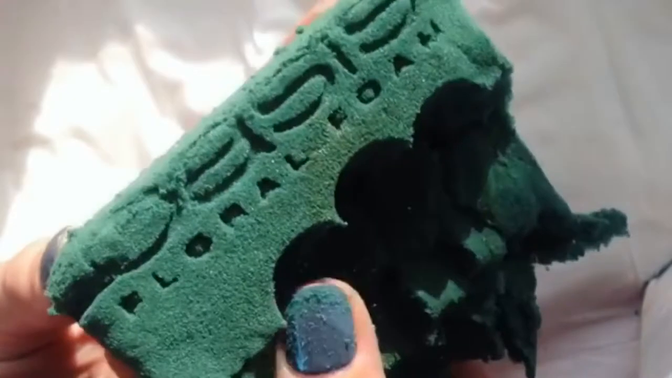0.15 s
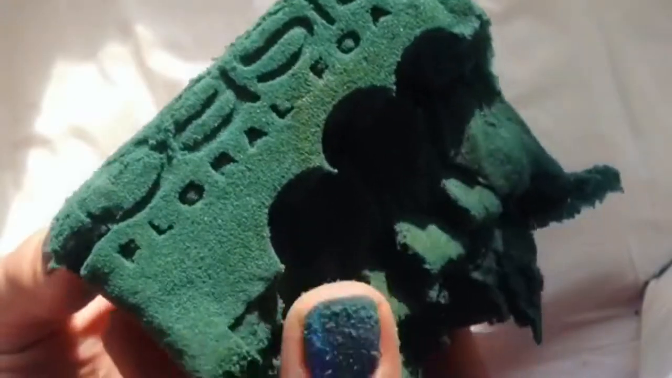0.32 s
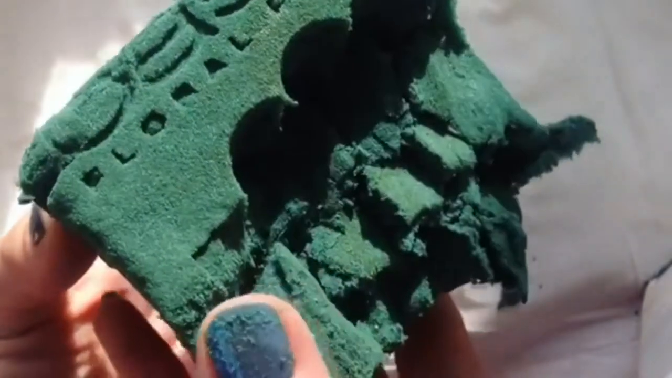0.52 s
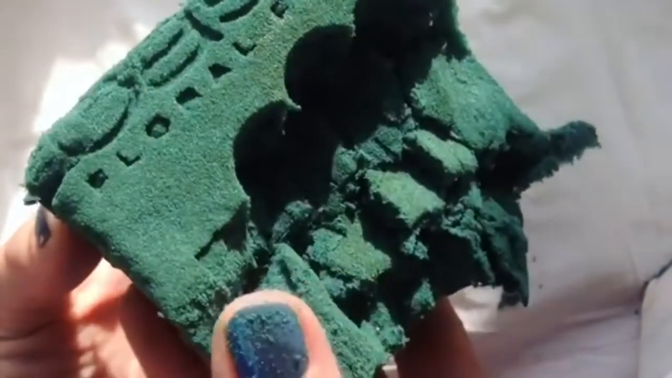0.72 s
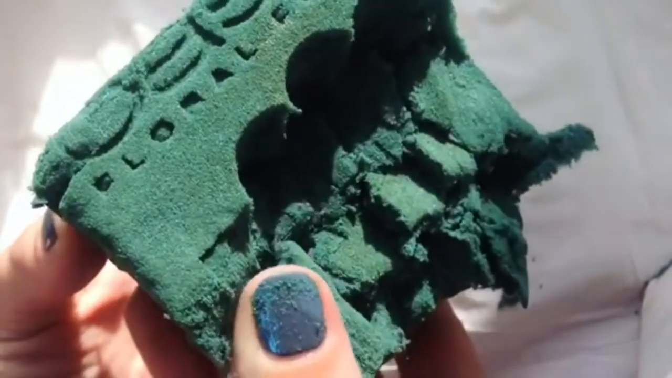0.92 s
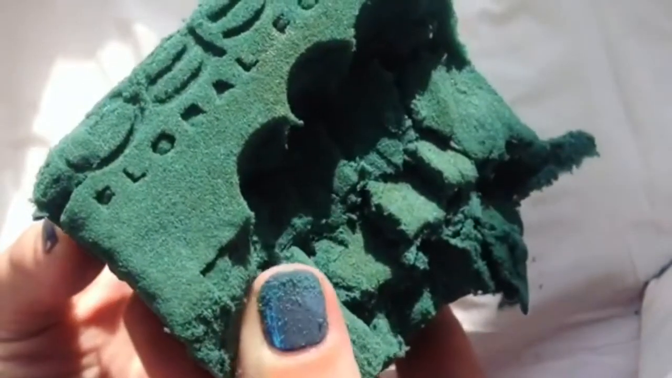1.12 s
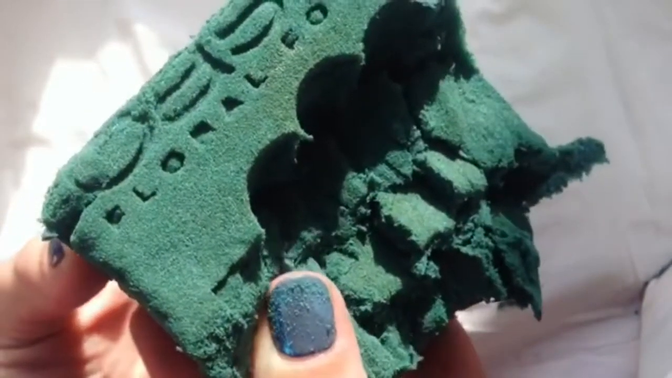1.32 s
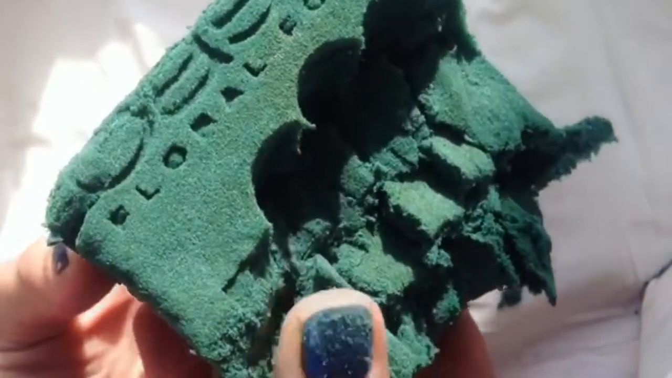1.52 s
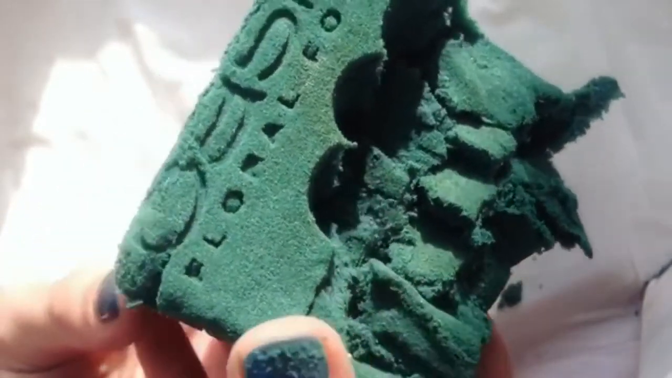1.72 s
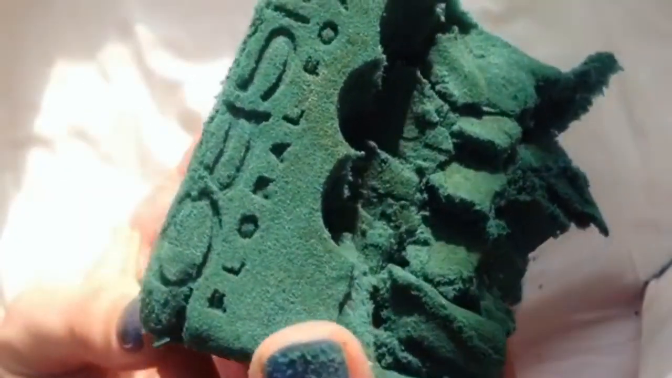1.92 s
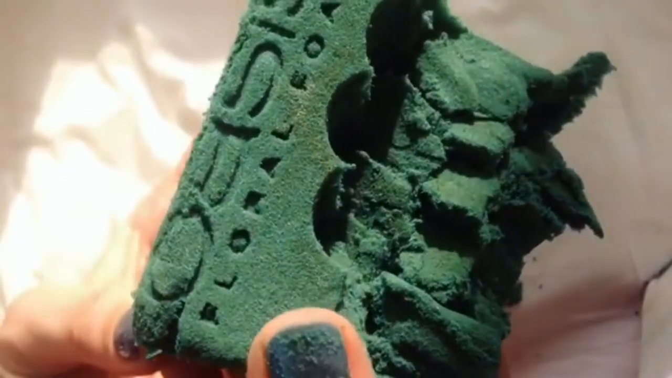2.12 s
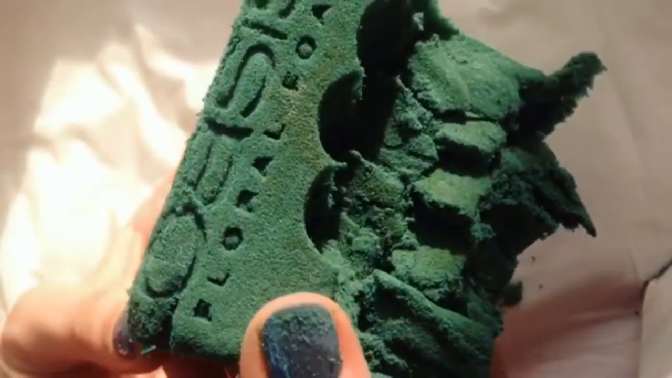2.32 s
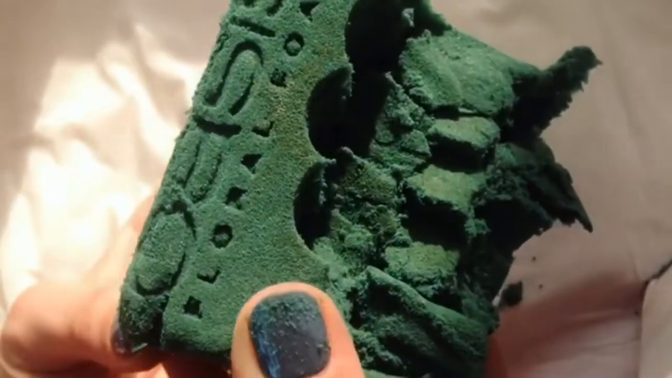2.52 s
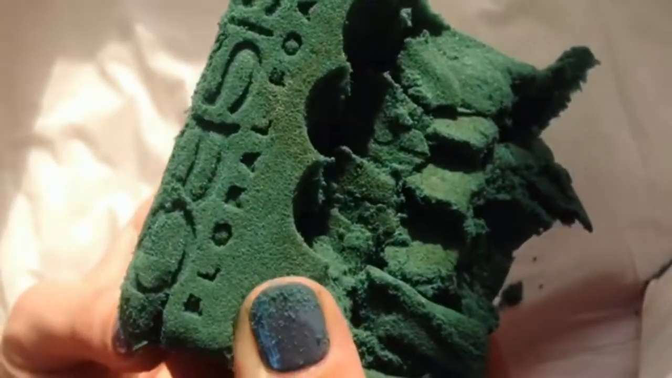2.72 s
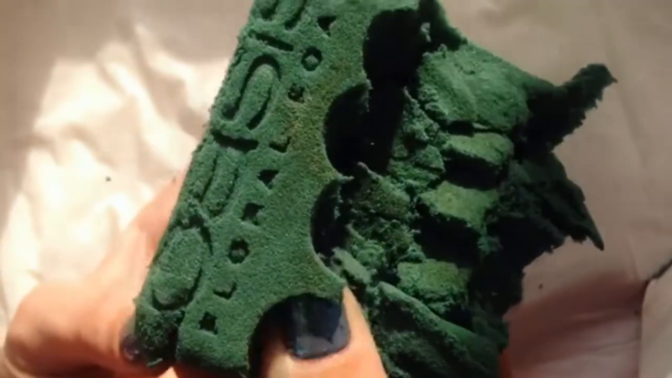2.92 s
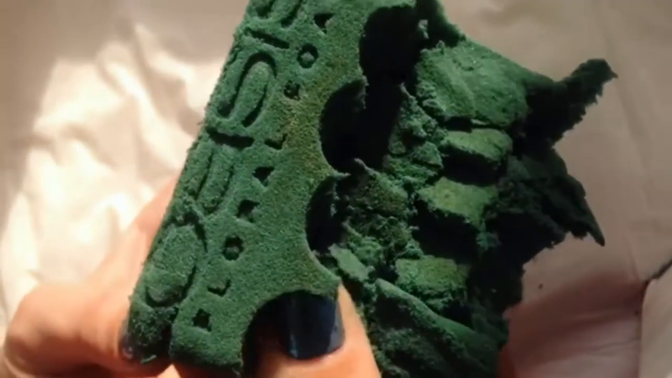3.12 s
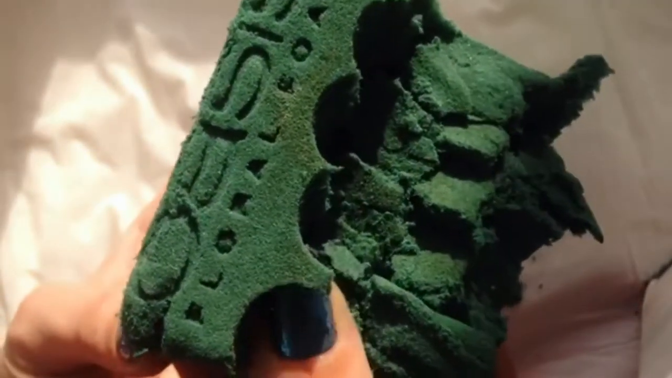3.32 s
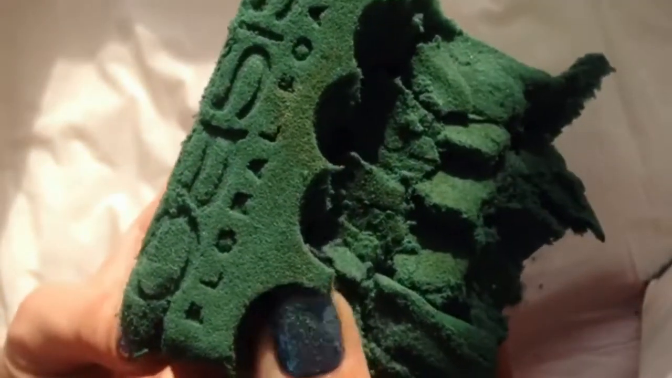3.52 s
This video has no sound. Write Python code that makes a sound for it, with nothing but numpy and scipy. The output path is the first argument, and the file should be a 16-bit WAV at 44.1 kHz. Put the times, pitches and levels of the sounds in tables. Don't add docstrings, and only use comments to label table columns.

```python
import sys
import numpy as np
from scipy import signal
from scipy.fft import rfft, irfft
from scipy.io import wavfile
from scipy.ndimage import uniform_filter1d

SR = 44100
rng = np.random.default_rng(int(sys.argv[2]) if len(sys.argv) > 2 else 0)


def invert_db(x):
    u = np.asarray(x, float) / 20
    return 10 ** u


def to_wav(s):
    ch = np.atleast_2d(s).T
    pcm = np.round(np.clip(ch, -1, 1) * 32767)
    wavfile.write(sys.argv[1], SR, pcm.astype(np.int16))


N = 160965


def unit(x):
    return x / np.sqrt(np.mean(x ** 2))


def ring(x, hz, width_hz):
    return signal.lfilter(*signal.iirpeak(hz, hz / width_hz, fs=SR), x)


def colour(x, table):
    f = np.linspace(1, SR / 2, 2049)
    hz, db = np.array(table).T
    log_gain = np.interp(np.log(f), np.log(hz), db) * np.log(10) / 20
    cepstrum = irfft(log_gain)
    cepstrum[1:2048] *= 2
    cepstrum[2049:] = 0
    impulse = irfft(np.exp(rfft(cepstrum)))
    return signal.fftconvolve(x, impulse)[:len(x)]


def walk(rate_hz):
    held = rng.standard_normal(N // 20)
    hold = max(int(SR / rate_hz), 20)
    steps = np.repeat(held, hold)[:N]
    return unit(uniform_filter1d(uniform_filter1d(steps, hold), hold))


# frequency_hz [Hz], level_db [dB]
ROOM_SPECTRUM = [(15, -22.5), (25, -7.5), (78, 5.5), (144, -2), (225, -4), (286, -7.5), (684, -19.5),
                 (4370, -12), (14000, -25)]
ROOM_DB = -61
HUM_HZ, HUM_DB = 58.7, -67
VENT_HZ, VENT_DB = 160.5, -66


def room():
    air = unit(colour(rng.standard_normal(N), ROOM_SPECTRUM))
    tone = invert_db(ROOM_DB + walk(7.8)) * air
    hum = unit(ring(ring(rng.standard_normal(N), HUM_HZ, 5), HUM_HZ, 6))
    vent = unit(ring(ring(rng.standard_normal(N), VENT_HZ, 30), VENT_HZ, 38))
    return tone + invert_db(HUM_DB) * hum + invert_db(VENT_DB + 2.1 * walk(4)) * vent


BURSTS_PER_S, BURST_SPREAD_DB = 14000, 1.5


def bursts():
    when = rng.random(N)
    size = rng.exponential(size=N)
    sign = rng.standard_normal(N)
    return unit((when < BURSTS_PER_S / SR) * invert_db(BURST_SPREAD_DB * size) * sign)


# frequency_hz [Hz], width_hz [Hz], level_db [dB]
DEEP_MODES = [(240, 83, -28.5), (513, 178, -8.5), (903, 250, -6), (1104, 267, -2)]
# frequency_hz [Hz], width_hz [Hz], level_db [dB]
WALL_MODES = [(1883, 570, -5.5), (2470, 294, -1.5), (3200, 1080, -11.5), (4680, 1700, -11.5)]
# frequency_hz [Hz], level_db [dB]
CELL_SPECTRUM = [(300, -38), (1000, -7.5), (2000, -8.5), (5500, -5.5), (7000, -5.5), (10500, -1.5),
                 (13500, -6.5), (17000, -14.5)]
# start_s [s], level_db [dB]
GRIP = [(0, -6.5), (.3, -1.5), (.4, -1), (1.45, 3.5), (1.9, -5), (2.2, -4), (2.4, 3), (2.95, -0.5),
        (3.05, -1.5)]
WALL_LEAN = (-0.5, 1, -0.5, 0)
MODE_SCATTER_DB = 2


def block(wall_env, deep_env, bright_env, jolts=0):
    pops, other = bursts(), bursts()

    def mode(k, env, hz, width_hz, db):
        drive = pops + np.roll(other, k * 997) + jolts
        return invert_db(db) * ring(env * invert_db(MODE_SCATTER_DB * walk(80)) * drive, hz, width_hz)

    grip = invert_db(np.interp(np.arange(N) / SR, *np.array(GRIP).T))
    knock = np.zeros(N)
    for k, row in enumerate(DEEP_MODES):
        knock += mode(k, deep_env, *row)
    for k, row in enumerate(WALL_MODES):
        knock += mode(-k - 1, wall_env * grip ** WALL_LEAN[k], *row)
    return 2 * knock + colour(bright_env * pops, CELL_SPECTRUM)


CLUMPS_PER_S, CLUMP_DB, CLUMP_TOP_DB = 400, 3.5, 7


def clumps():
    def bunching():
        return np.minimum(CLUMP_DB * (walk(CLUMPS_PER_S) ** 2 - 1) / 2, CLUMP_TOP_DB)

    shared, own = bunching(), bunching()
    return invert_db(np.array([shared, shared, (shared + own) / 2]))


# peak_s [s], level_db [dB], rise_s [s], fall_s [s], brightness_db [dB]
RUBS = [(0.069, -50, 0.19, 0.3, -6), (.165, -49.5, 0.17, 0.052, 5), (.32, -49.5, 0.092, 0.61, 1),
        (0.459, -44.5, 0.74, 0.22, -18), (0.611, -53.5, 0.062, 0.1, -22), (0.757, -39, 0.085, 0.1, -4),
        (1.668, -43, 0.23, 0.22, 0), (1.875, -41, 0.33, 0.22, -24), (2.001, -45.5, 0.16, 0.15, -28),
        (2.125, -41.5, 0.26, 0.14, -22), (2.25, -53.5, 0.49, 0.33, -22), (2.33, -51, 0.21, 0.058, 3.5),
        (3.609, -49.5, 0.16, 0.21, 1)]
# peak_s [s], level_db [dB], rise_s [s], fall_s [s], depth_db [dB]
SQUEEZES = [(0.226, -19.5, 0.013, 0.13, 2.5), (0.248, -20, 0.091, 0.059, -5.5),
            (0.272, -23.5, 0.12, 0.025, 1), (0.284, -32, 0.037, 0.03, -7), (0.932, -41, 0.34, 0.54, -1),
            (1.03, -33.5, 0.23, 0.23, -5), (1.148, -33.5, 0.16, 0.33, -4.5),
            (1.269, -35.5, 0.14, 0.22, -5.5), (1.36, -33.5, 0.26, 0.2, -5.5), (1.421, -33, 0.23, 0.2, -11),
            (1.5, -36, 0.13, 0.096, -19), (2.389, -38, 0.14, 0.25, -3.5), (2.47, -41.5, 0.093, 0.5, -10),
            (2.544, -31, 0.035, 0.05, -7), (2.638, -37.5, 0.032, .05, -6), (2.671, -36, 0.071, 0.058, -32),
            (2.822, -30, 0.21, 0.081, -6.5), (2.878, -35, 0.061, 0.019, -7), (2.928, -37, 0.094, 0.04, -7),
            (2.96, -38.5, 0.14, .15, -4.5), (3.08, -23, 0.052, 0.096, -4.5), (3.11, -42, .06, 0.24, -3),
            (3.267, -31, 0.11, 0.087, -5), (3.39, -33.5, 0.22, 0.13, -6)]
FADE_DB = 47.5
RUB_DEPTH_DB, RUB_CELLS_DB = -16, 0.5
DULL_PER_DEPTH = 0.25


def rubs_and_squeezes(t):
    power = np.zeros((3, N))
    rows = [(*r, -DULL_PER_DEPTH * r[4]) for r in SQUEEZES]
    rows += [(*r[:4], RUB_DEPTH_DB, r[4]) for r in RUBS]
    for at, db, rise, fall, depth_db, bright_db in rows:
        near = slice(max(int((at - 2 * rise) * SR), 0), int((at + 2 * fall) * SR))
        u = np.where(t[near] < at, (at - t[near]) / rise, (t[near] - at) / fall)
        swell = invert_db(db - FADE_DB * u ** 1.114)
        balance = invert_db(np.array([[0], [depth_db], [bright_db + RUB_CELLS_DB]]))
        power[:, near] += (swell * balance) ** 2
    return block(*(np.sqrt(power) * clumps()))


# start_s [s], level_db [dB], depth_db [dB], length_ms [ms]
TICKS = [(0.057, -41, -4, 2), (.148, -33, 2.5, 1.04), (0.402, -38, -9, 1.7), (0.747, -38, -12, 1.4),
         (.921, -46, -17, 0.99), (1.882, -37, 7, 0.83), (1.992, -45, 15, 0.77), (2.075, -44, 7, 1.2),
         (2.279, -37.5, -2, 1.9), (3.223, -36, -2.5, 1.3), (3.61, -39.5, -12, 1.5)]
# start_s [s], level_db [dB], depth_db [dB], length_ms [ms]
CRUSH = [(0.1845, -29, -3, 1.1), (.1985, -18, 4, 1.3), (0.2086, -1, -4, 1.04), (0.2103, -1, -5, 0.67),
         (.216, -6, 0, 1), (0.224, -10, 3, 1.1), (0.231, -13, -11, 0.98), (.238, -9, -26, 1.7),
         (0.251, -6, 7.5, 1.6), (.2605, -17, 4, 2.2), (0.271, -19, 4, 1.9), (0.22, -14, -6, 0.86)]
# start_s [s], level_db [dB], depth_db [dB], length_ms [ms]
CRUMBLE = [(0.9459, -9.5, 6.5, 1.23), (0.984, -22, -2, 1), (.998, -24.5, 5, 2.2), (1.021, -25, 7, 1.3),
           (1.053, -22, -3.5, 5.1), (1.078, -24, 3.5, 1.1), (1.112, -24, -16, 2.4), (1.14, -16.5, 0, 2.3),
           (1.151, -17, -4, 1.2), (1.161, -30, -2, 1.5), (0.957, -21, 5, 1.5), (1.033, -24, 5, 1.6),
           (1.131, -22.5, 4, 0.91), (1.177, -30, 9, 1.4), (1.194, -31, 3, 1.1), (1.226, -27, 3, 1.8),
           (1.263, -20.5, 7, 1.05), (1.348, -19, -8, 0.62), (1.417, -19, -12, 1.1), (1.503, -18, -6, 0.88),
           (1.2136, -12.5, -14, 0.44), (1.247, -21, -2.5, 5), (1.279, -17, -6, 2.9),
           (1.3059, -14.5, -7, 1.2), (1.3409, -15.5, -8, 1.06), (1.374, -19, -7, 3.4),
           (1.391, -18, -2, 2.8), (1.41, -17, -6, 0.93), (1.422, -17, 1.5, 3.1), (1.476, -18, -6.5, 2.1),
           (1.489, -16.5, 1, 2.1)]
# start_s [s], level_db [dB], depth_db [dB], length_ms [ms]
SNAPS = [(2.353, -26.5, 4, 1), (2.374, -6.5, 0, 1.32), (2.383, -26, 2, 2.4), (2.427, -11.5, -4.5, 1.54),
         (2.455, -43, -8, 1.1), (2.473, -28, 5, 1.2), (2.493, -29.5, 6.5, 1.2), (2.513, -20, 2, 1.25),
         (2.546, -24, 2.5, 2.2), (2.6209, -22, 11, 1.8), (2.624, -17.5, -3, 3.2), (2.655, -20, 3, 1.5),
         (2.667, -17, 6.5, 1.86), (2.709, -13.5, 1, 2.95), (2.739, -23, 5, 0.7), (2.745, -12, 2.5, 2.26),
         (2.755, -22, 4, 0.45), (2.768, -34, 5, 1.4), (2.809, -16, 6, 2.5), (2.828, -11.5, -0.5, 1.6),
         (2.87, -13.5, 0, 0.78), (2.921, -15, -1, 3.7), (2.945, -8.5, 7, 3.34), (3.062, -15, -1, 3),
         (3.242, -17, -1, 2), (3.2558, -15.5, -1, 0.95), (3.279, -26, -8, 1.7), (3.35, -26.5, -8, 2.1),
         (3.081, -18.5, 3.5, 1.1), (3.092, -20.5, 1.5, 1.5), (3.097, -16, -2, 1.6), (3.337, -23.5, -7, 1.6),
         (3.4, -26.5, -9, 6.2)]
CRACK_RISE, BREAK_RISE = 0.78, 0.093
CRACK_DB, CRACK_CELLS_DB, SNAP_DB = -6, -3, 7
DULL_PER_DB = 0.0868


def cracks():
    env, jolts = np.zeros((3, N + SR)), np.zeros(N)
    u_ms = (np.arange(1500) - 500) * 1000 / SR
    rows = [(*r, CRACK_RISE) for r in CRUSH + CRUMBLE + SNAPS + TICKS]
    rows += [(*r, BREAK_RISE) for r in BREAKS]
    for at, db, depth_db, ms, rise in rows:
        shape = np.exp(-np.where(u_ms < 0, -u_ms / rise, u_ms) / ms)
        bright_db = CRACK_CELLS_DB - DULL_PER_DEPTH * depth_db - DULL_PER_DB * max(db + 8.5, -10)
        balance_db = np.array([[0], [depth_db], [bright_db]])
        peak = int((at + ms / 2000) * SR)
        env[:, peak - 500:peak + 1000] += invert_db(db + CRACK_DB + balance_db) * shape
        jolts[peak] = invert_db(SNAP_DB) / ms
    return block(*env[:, :N], jolts)


# peak_s [s], level_db [dB], pitch_hz [Hz], length_ms [ms]
PINGS = [(0.21, -9, 2950, 1.1), (.21, -5, 4950, 1.2), (0.236, -12, 2690, 2.2), (0.2558, -11.5, 3300, 1.5),
         (.268, -14, 1890, 4.2), (1.141, -16, 2660, 1), (1.249, -22, 1797, 3), (1.341, -18.5, 2460, 1.5),
         (1.376, -24, 2460, 3.9), (1.861, -37, 2440, 3.5), (1.886, -36, 1690, 4), (2.375, -19.5, 525, 1.02),
         (2.787, -14.5, 2540, 2.3), (2.81, -27, 2500, 2.5), (2.946, -13, 2590, 1.2),
         (3.072, -11, 3320, 1.9), (3.256, -17.5, 2970, 0.9), (3.3667, -3.5, 1900, 0.83),
         (3.366, -15.5, 790, 1.06)]
# peak_s [s], level_db [dB], pitch_hz [Hz], length_ms [ms]
THUDS = [
    (2.376, -42.5, 250, 6.9),
    (3.071, -35.5, 130, 6.5),
]
PING_RISE = 0.65


def pings_and_thuds():
    out = np.zeros(N)
    u = (np.arange(3000) - 1000) / SR
    for (at, db, hz, ms), turn in zip(PINGS + THUDS, rng.random(99)):
        shape = np.exp(-np.where(u < 0, -u / PING_RISE, u) * 1000 / ms)
        k = int(at * SR) - 1000
        out[k:k + len(u)] += invert_db(db) * shape * np.sin(2 * np.pi * (hz * u + turn))
    return signal.sosfilt(signal.butter(2, 80, "high", fs=SR, output="sos"), out)


# start_s [s], level_db [dB], depth_db [dB], length_ms [ms]
BREAKS = [
    (2.7751, -8.5, 3.5, 1.15),
    (2.787, -13, -3, 1.6),
    (3.0694, 1.5, 1, 1.976),
    (3.366, 2, -3.5, 0.64),
]
# pitch_hz [Hz], level_db [dB], t60_s per ms of break [s/ms]
RING_MODES = [(1100, 0.5, 0.014), (1883, 0.5, 0.011), (2660, -11, .017), (3320, 3.5, 0.0043)]
RING_DB = -8.5


def breaks(t):
    out = np.zeros(N)
    u = t[:2000]
    for at, db, depth_db, ms in BREAKS:
        k = int((at + ms / 2000) * SR)
        phases = rng.random(len(RING_MODES)) * 2 * np.pi
        for (hz, mode_db, t60), phase in zip(RING_MODES, phases):
            onset = np.minimum(u * 2 * hz, 1)
            tone = np.sin(2 * np.pi * hz * u + phase) * invert_db(-60 * u / t60 / ms) * onset
            level_db = db + RING_DB + mode_db + depth_db * (hz < 1500)
            out[k:k + len(u)] += invert_db(level_db) * tone
    return out


ECHO_T60_S, ECHO_DB = 0.06, -22


def echo(x, t):
    tail = rng.standard_normal(8000) * invert_db(-60 * t[:8000] / ECHO_T60_S) * (t[:8000] > 0.003)
    return invert_db(ECHO_DB) * signal.fftconvolve(x, tail / np.sqrt(np.sum(tail ** 2)))[:N]


def scene():
    t = np.arange(N) / SR
    foam = rubs_and_squeezes(t) + cracks() + breaks(t)
    foam = signal.sosfilt(signal.butter(2, 170, "high", fs=SR, output="sos"), foam)
    return (foam + echo(foam, t) + room() + pings_and_thuds())[None]


def top_cut(x):
    return signal.sosfilt(signal.butter(12, 16790, fs=SR, output="sos"), x)


SHELF_HZ, SHELF_DB, TOP_HZ = 13950, -17, 15750


def record(dry):
    f = np.fft.rfftfreq(N, 1 / SR)
    corner_hz = [SHELF_HZ, SHELF_HZ + 150, TOP_HZ, TOP_HZ + 200, TOP_HZ + 1000]
    gain = invert_db(np.interp(f, corner_hz, [0, SHELF_DB, SHELF_DB, -27, -45]))
    mix = irfft(rfft(np.tanh(dry)) * gain, N)
    return top_cut(mix)


dry = scene()
out = record(dry)
to_wav(out)
```